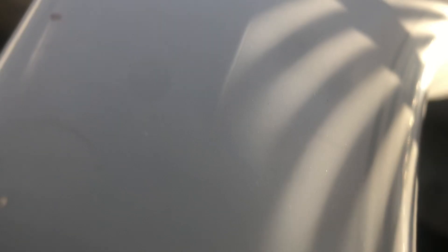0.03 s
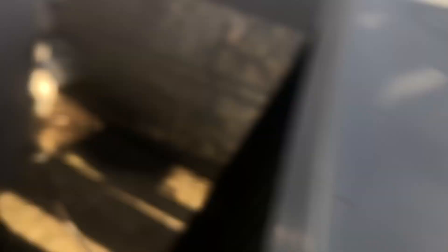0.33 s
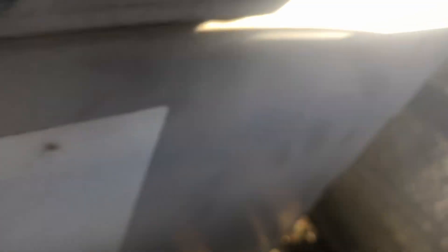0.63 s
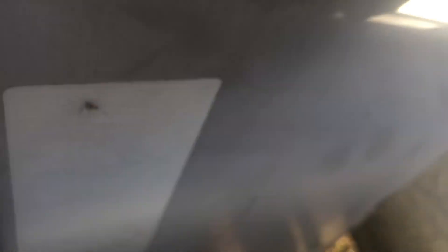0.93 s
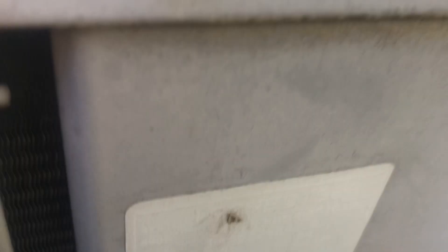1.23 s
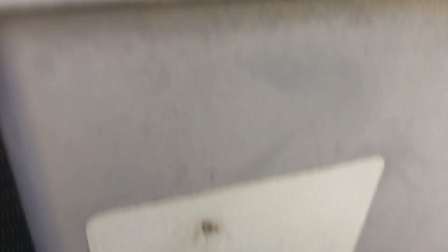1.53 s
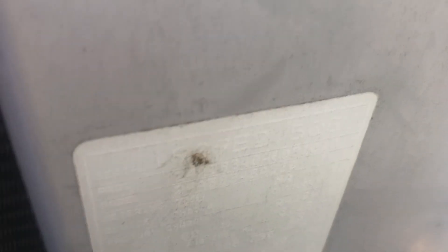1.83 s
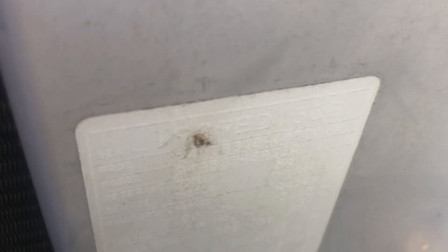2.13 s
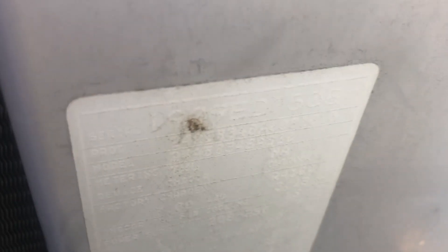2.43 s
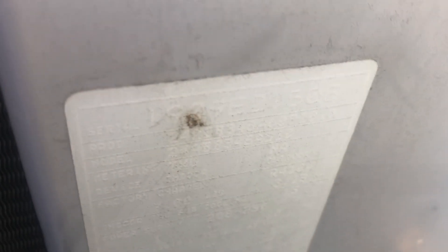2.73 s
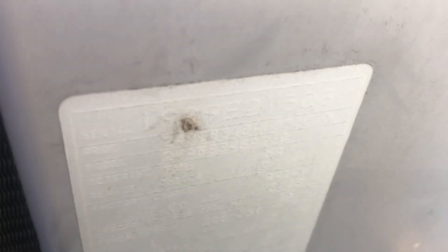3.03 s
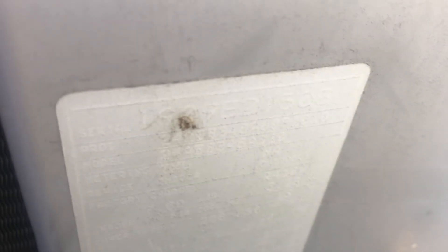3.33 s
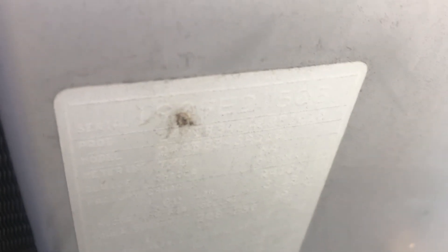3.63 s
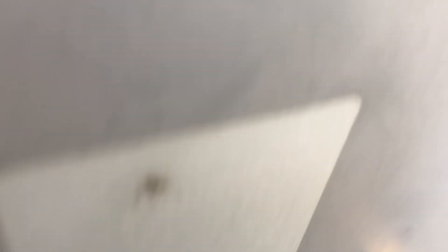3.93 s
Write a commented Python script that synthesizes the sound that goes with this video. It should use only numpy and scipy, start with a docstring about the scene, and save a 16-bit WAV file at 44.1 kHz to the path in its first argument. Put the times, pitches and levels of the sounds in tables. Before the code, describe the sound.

Close outdoor hum of a heat pump, its fan throbbing and compressor buzzing. It opens with a short, overloaded rattle as the microphone touches the shaking cabinet, then the ducked drone gradually rises and steadies amid faint handling bumps.

```python
"""Outdoors, beside a running heat pump: the fan's blades throb in rushing air and the compressor buzzes.
At first the microphone's housing touches the shaking cabinet and rattles about once per passing blade.
This overloads the microphone and turns its gain down. The hum swells back as the gain recovers,
with a few soft bumps from the fingers holding the microphone."""
import sys
import numpy as np
from scipy import signal
from scipy.io import wavfile
from scipy.ndimage import uniform_filter1d, minimum_filter1d

SR = 44100
rng = np.random.default_rng(int(sys.argv[2]) if len(sys.argv) > 2 else 0)


def bounce(signal):
    """Save signal as a 16-bit WAV file at the path given by the first command-line argument."""
    frames = np.transpose(np.atleast_2d(signal))
    limited = np.clip(frames, -1, 1)
    pcm = np.round(limited * 32767).astype(np.int16)
    wavfile.write(sys.argv[1], SR, pcm)


N = 176400  # 4 seconds


# Boost or cut of air and compressor as the microphone moves round the cabinet: t/s, level/dB
NEARNESS = [(0, 4), (.6, 1.7), (1, 1), (1.35, 1.5), (1.9, 0.8), (2.4, .5), (3, -0.1), (3.5, -0.4), (4, 0.2)]
# Boost or cut of the treble from the same movement: t/s, level/dB
TREBLE = [(0, 2), (.7, -3.5), (.95, -1.5), (1.12, 0.5), (1.5, -1.5), (2.2, -1), (3, .5), (4, .5)]
def heat_pump(t, blade_hz=36.806, wander_cycles=0.0054):
    """Fan, air and compressor together, heard through a moving microphone."""
    blade_phase = 2 * np.pi * (blade_hz * t + wander_cycles * drift(1))
    machine = fan(blade_phase) + gain_curve(NEARNESS, t) * (air(blade_phase) + compressor(t))
    treble = butter(machine, 4500, "high", order=1)
    return machine + (gain_curve(TREBLE, t) - 1) * treble


# The low tones of the fan's throb: multiple of the blade rate, level/dB
FAN_TONES = [(1, -25.5), (2, -20.5), (3, -33), (4, -38.5), (5, -49)]
def fan(blade_phase, waver_db=0.3):
    """Each passing blade pushes the air; the pulses make a few low tones that stay in step."""
    return sum(np.sqrt(2) * from_db(db + waver_db * drift(4.4)) * np.cos(multiple * blade_phase)
               for multiple, db in FAN_TONES)


# Strength of the rushing air in each 1 Hz slice, from low to high: f/Hz, level/dB
AIR_SPECTRUM = [(25, -75.4), (55, -55), (95, -55.5), (165, -59), (260, -59), (420, -58.5), (800, -62.5),
                (1300, -69), (1700, -76), (2600, -80.4), (3300, -78), (4200, -77.5), (5200, -82.5),
                (6100, -82), (7300, -84.5), (8700, -85.5), (11000, -91.5), (12000, -92), (15500, -94.5)]
def air(blade_phase, flicker_db=0.74, chop_depth=0.14):
    """Swirling air makes bands of noise that flicker, and pulse twice per passing blade."""
    edges_hz = 22 * 2 ** (np.arange(30) / 3)  # three bands per octave
    noise = rng.standard_normal((2, N))
    out = np.zeros(N)
    for k, (low, high) in enumerate(zip(edges_hz, edges_hz[1:])):
        db = level_at_hz(AIR_SPECTRUM, np.sqrt(low * high)) + flicker_db * drift(11)
        band = unit_rms(butter(noise[k % 2], [low, high], "band", order=3))
        out += np.sqrt(high - low) * from_db(db) * band
    return out * (1 - chop_depth * np.cos(2 * blade_phase))


# Compressor tones with a level of their own: multiple of the shaft speed, level/dB
STANDOUT_TONES = [(11, -47), (15, -47), (16, -55.5), (17, -50), (18, -51.5), (19, -48), (20, -42),
                  (21, -42), (22, -48), (24, -55.5), (26, -53.3), (27, -61), (31, -58.0), (33, -62),
                  (34, -60), (56, -56.5), (72, -58), (76, -69), (79, -65), (82, -56.5), (83, -61.5),
                  (87, -73), (95, -56), (100, -59.5), (103, -57.5), (106, -60.5), (134, -70), (138, -57.5),
                  (153, -63.5), (157, -74), (159, -71), (165, -76), (167, -73), (178, -66.8), (182, -74),
                  (183, -66), (192, -67.5), (196, -74)]
# Typical strength of each of its other tones: f/Hz, level/dB
BUZZ_SPECTRUM = [(300, -60), (900, -55), (1600, -66.7), (2600, -70.5), (4400, -70.0), (6200, -71.5),
                 (7500, -80), (10000, -71), (12500, -81), (15000, -81)]
# Boost or cut of one thin whine among the tones: t/s, level/dB
WHINE_SWELL = [(0, -6), (2.0, -2), (2.5, -1), (2.8, 1), (3.3, 2), (4, -1)]
def compressor(t, shaft_hz=59.045, whine_multiple=138, scatter_db=4, waver_depth=0.24):
    """The spinning shaft buzzes with tones at multiples of its speed, each wavering on its own."""
    multiples = np.arange(4, 268)
    scatter = np.clip(rng.standard_normal(len(multiples)), -2, 1.6)
    levels_db = level_at_hz(BUZZ_SPECTRUM, multiples * shaft_hz) + scatter_db * scatter
    standout_db = dict(STANDOUT_TONES)
    out = np.zeros(N)
    for multiple, db in zip(multiples, levels_db):
        tone = np.sqrt(2) * np.cos(2 * np.pi * (multiple * shaft_hz * t + rng.random()))
        if multiple == whine_multiple:
            tone *= gain_curve(WHINE_SWELL, t)
        out += from_db(standout_db.get(multiple, db)) * tone * (1 + waver_depth * drift(5))
    return out


# Knocks on the cabinet: t/s, then level/dB of the low thump, middle knock, high clack and sharp tick
KNOCKS = [(0, 4.5, -2, -9, -27), (0.017, 2, 0, 3.5, -10.5), (0.0418, 7.5, 5, -5, -16.5),
          (0.0704, 4.5, 1, 1, -8.5), (.1, 8.5, 7.5, 1, -10.5), (.126, 3, 4.5, 1.5, -13),
          (0.1526, 3, 8, -4, -15), (.18, 10, 4.5, -0.5, -12.5), (0.2084, 7.5, 3.5, 1.5, -8.5),
          (0.2355, 1.5, 6, 0, -20), (0.2618, 4.5, 1, 0.5, -13), (.297, 4.5, 1, -5.5, -19.5),
          (.319, -1, -2, -22.5, -34), (0.3453, 0, 4.5, -2.5, -22), (.377, -1.5, -0.5, -13.5, -26.5)]
def rattle(size=6000, bounces=3, bounce_span_s=0.003, bounce_db=-6, tick_lead_s=0.006):
    """The housing hits the cabinet hard and bounces briefly, ringing under a gritty tick."""
    out = np.zeros(N)
    for start_s, *ring_levels_db, tick_db in KNOCKS:
        clicks = signal.unit_impulse(size)
        bounce_samples = (rng.random(bounces) * bounce_span_s * SR).astype(int) + 1
        clicks[bounce_samples] += from_db(bounce_db) * rng.normal(size=bounces)
        thump_knock_clack = housing(clicks).reshape(3, -1, size).sum(axis=1)
        for part, db in zip(thump_knock_clack, ring_levels_db):
            add(out, start_s, at_level(part, db))
        add(out, start_s - tick_lead_s, tick(tick_db, tick_lead_s, size))
    return out


def tick(db, lead_s, size, peak_s=0.0018, rise_s=0.00082, decay_s=0.00052, tail_db=-23, tail_s=0.0056):
    """Hard contact makes a tiny burst of noise with a faint tail; softer ticks are duller."""
    from_peak = np.arange(size) / SR - lead_s - peak_s
    after_peak = np.maximum(from_peak, 0)
    rise = np.exp(np.minimum(from_peak, 0) / rise_s)
    fall = np.exp(-after_peak / decay_s) + from_db(tail_db) * np.exp(-after_peak / tail_s)
    burst = rise * fall * rng.standard_normal(size)
    grit = butter(butter(burst, 1680, "high"), 1860, "low")
    top_hz = 11600 * 2 ** ((db + 7.5) / 8.5)  # an octave lower for every 8.5 dB softer
    return at_level(butter(grit, top_hz, "low"), db)


# The housing's ringing tones, four each for thump, knock and clack: f/Hz, level/dB, time to fade 60 dB/s
HOUSING_TONES = [(66.2, -3, .07), (101.4, 0.5, 0.057), (135.6, 0.5, 0.054), (170.2, -1.5, 0.059),
                 (234.6, 0, 0.041), (308.4, 0.5, 0.031), (418, 0, .022), (570, 1, 0.019),
                 (740, -0.5, 0.012), (928, 0.5, 0.0096), (1207, 0.5, 0.0054), (1586, -2.5, 0.0029)]
def housing(contact, detune=0.082, scatter_db=2):
    """A touch sets the microphone's housing ringing, a little differently each time; one row per tone."""
    force = butter(butter(contact, 2500, "low"), 50, "high")  # a touch has some give, dulling the top
    tones = []
    for k, (hz, db, fade_s) in enumerate(HOUSING_TONES):
        gain = (-1) ** k * from_db(db + scatter_db * rng.normal())
        pitch_hz = hz * np.exp(detune * rng.normal())
        tones.append(gain * ring(force, pitch_hz, fade_s))
    return np.array(tones)


def scrape(t, slips_per_s=900, level_db=-0.5):
    """Between knocks the housing rubs on the cabinet in many small slips, until it lifts off."""
    slips = (rng.random(N) < slips_per_s / SR) * rng.standard_normal(N)
    rubbing = unit_rms(butter(housing(slips).sum(axis=0), 655, "low", order=1))
    pressure = hold_then_fade(t, hold_s=0.31, fade_s=0.052)
    return from_db(level_db) * pressure * rubbing


# Soft finger bumps on the housing: t/s, level/dB
BUMPS = [(.42, -9), (.434, -15), (.472, -10.5), (.487, -9), (.56, -16.5), (.643, -22), (.78, -23.5),
         (.87, -27), (.98, -18.5), (1.057, -13), (1.343, -20.5), (1.378, -20.5), (1.412, -26.5),
         (1.858, -21.5), (2.039, -27.5), (2.238, -17.5), (2.31, -23), (2.51, -25.5)]
def handling(t, soft_hz=202, grip_db=-32.5, uneven_db=2.5):
    """Finger bumps and a shifting grip push softly, so mostly the housing's low tones ring."""
    out = np.zeros(N)
    push = butter(signal.unit_impulse(6000), soft_hz, "low")
    for start_s, db in BUMPS:
        add(out, start_s, at_level(housing(push).sum(axis=0), db))
    grip = from_db(grip_db + uneven_db * drift(6)) * hold_then_fade(t, hold_s=1.36, fade_s=0.66)
    rumble = housing(butter(rng.standard_normal(N), soft_hz, "low")).sum(axis=0)
    return out + grip * unit_rms(rumble)


# Light finger strokes: t/s of the middle, half-length/s, level/dB
BRUSHES = [(0.571, 0.038, -39), (1.045, .022, -45)]
def finger_brushes(t):
    """Fingers slide over the housing with a faint, high hiss."""
    strokes = sum(from_db(db) * np.exp(-((t - middle_s) / half_s) ** 2)
                  for middle_s, half_s, db in BRUSHES)
    return strokes * unit_rms(butter(rng.standard_normal(N), 7000, "high", order=1))


def from_db(db):
    """Turn decibels into a number to multiply by."""
    return 10 ** (np.asarray(db) / 20)


def unit_rms(x):
    """Scale a signal so that its average strength (rms) is 1."""
    return x / np.sqrt(np.mean(x ** 2) + 1e-20)


def at_level(x, db, span_s=0.026):
    """Give a short sound the energy of a steady one lasting span_s at this level."""
    return from_db(db) * x / np.sqrt(np.sum(x ** 2) / (span_s * SR) + 1e-20)


def gain_curve(table, t):
    """Glide between the rows of a time and level table, giving a gain."""
    return from_db(np.interp(t, *np.transpose(table)))


def level_at_hz(table, hz):
    """Read between the rows of a frequency and level table, with octaves evenly spaced."""
    table_hz, table_db = np.transpose(table)
    return np.interp(np.log(hz), np.log(table_hz), table_db)


def hold_then_fade(t, hold_s, fade_s):
    """Stay at 1, then die away."""
    return np.exp(-np.maximum(t - hold_s, 0) / fade_s)


def butter(x, hz, kind, order=2):
    """Filter a sound, keeping its "low" part, its "high" part or a "band"."""
    return signal.sosfilt(signal.butter(order, np.clip(hz, 10, .45 * SR), kind, fs=SR, output="sos"), x)


def drift(speed):
    """A smooth random wobble of typical size 1; a higher speed wobbles faster."""
    memory = np.exp(-2 * np.pi * speed / 500)
    slow = signal.lfilter([1], [1, -2 * memory, memory ** 2], rng.standard_normal(3000))[1000:]
    return np.interp(np.linspace(0, len(slow) - 1, N), np.arange(len(slow)), unit_rms(slow))


def ring(force, hz, fade_s):
    """Each push starts a pure tone that falls 60 dB in fade_s."""
    decay = from_db(-60 / (fade_s * SR))
    angle = 2 * np.pi * hz / SR
    return signal.lfilter([0, np.sin(angle)], [1, -2 * decay * np.cos(angle), decay ** 2], force + 1e-18)


def add(out, start_s, x):
    """Mix a sound in at a given time."""
    i = max(int(start_s * SR), 0)
    out[i:i + len(x)] += x[:N - i]


def scene():
    """The running heat pump plus everything that touches the microphone, in one channel."""
    t = np.arange(N) / SR
    return (heat_pump(t) + rattle() + scrape(t) + handling(t) + finger_brushes(t))[None]


def record(dry, overload_db=21.5, ceiling_db=-0.58, recovery_db_per_s=7.5, hold_s=0.049, top_hz=15750):
    """The microphone overloads; its gain drops fast and recovers slowly; the highest treble is cut."""
    squashed = dry[0] / (1 + (dry[0] / from_db(overload_db)) ** 6) ** (1 / 6)  # rounds off big peaks
    excess_db = np.maximum(20 * np.log10(np.abs(squashed) + 1e-9) - ceiling_db, 0)
    recovery_db = recovery_db_per_s * np.arange(N) / SR
    cut_db = np.maximum.accumulate(excess_db + recovery_db) - recovery_db
    hold = int(hold_s * SR)
    gain_db = uniform_filter1d(minimum_filter1d(-cut_db, 2 * hold), hold)  # hold each dip, then smooth it
    treble_cut = signal.ellip(12, .1, 80, top_hz, fs=SR, output="sos")
    return signal.sosfilt(treble_cut, squashed * from_db(gain_db))[None]


dry = scene()
out = record(dry)
bounce(out)
```